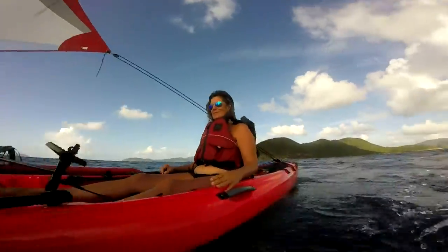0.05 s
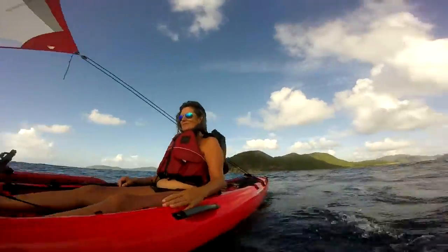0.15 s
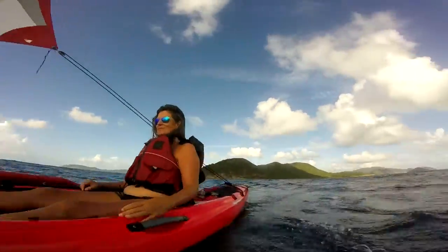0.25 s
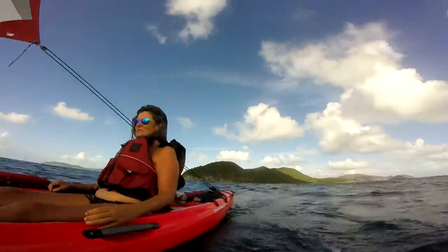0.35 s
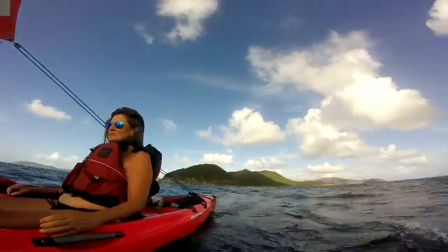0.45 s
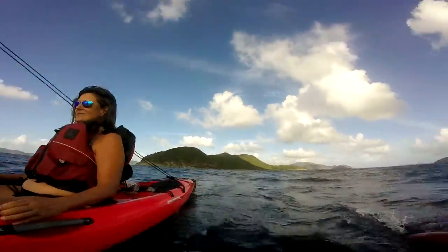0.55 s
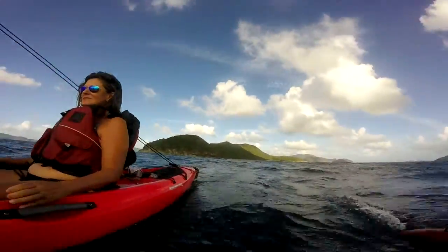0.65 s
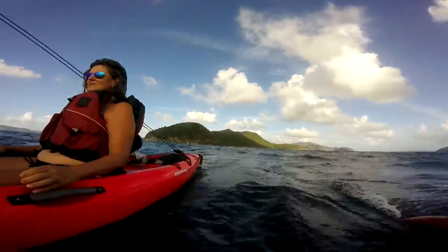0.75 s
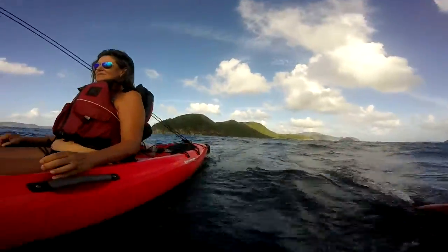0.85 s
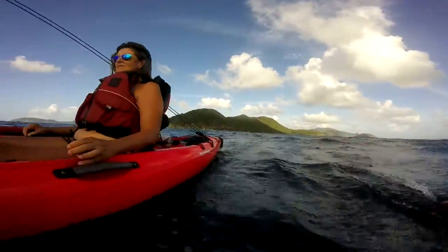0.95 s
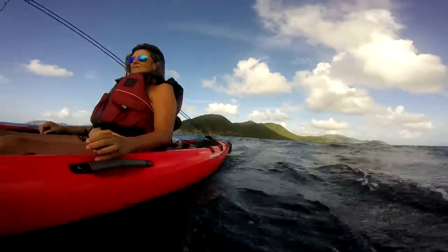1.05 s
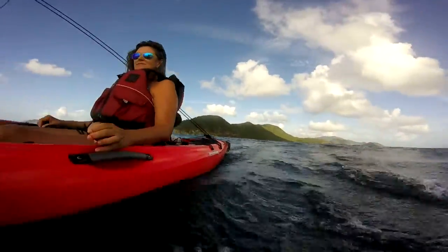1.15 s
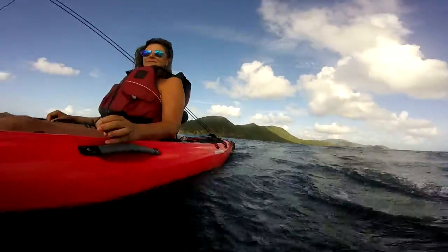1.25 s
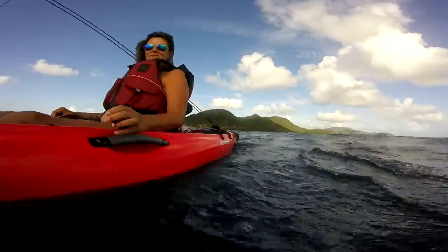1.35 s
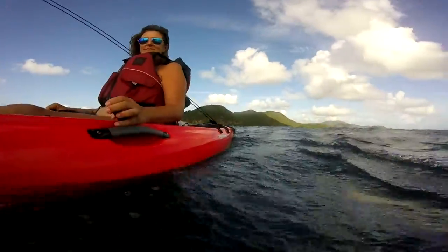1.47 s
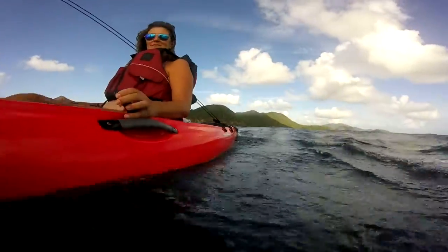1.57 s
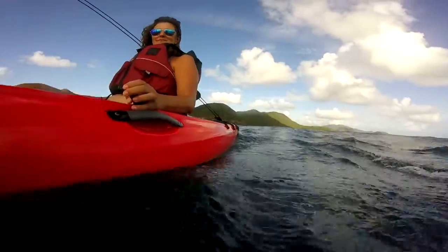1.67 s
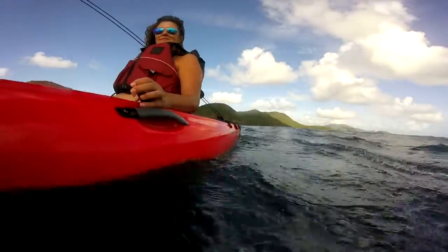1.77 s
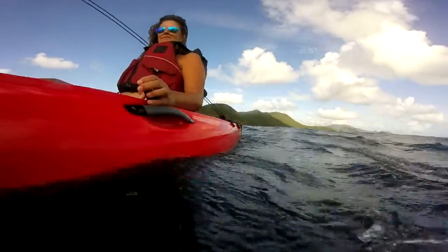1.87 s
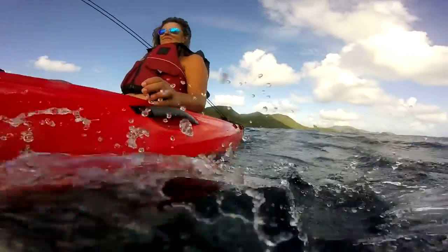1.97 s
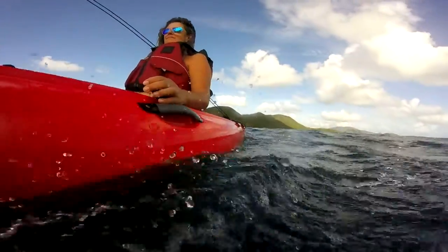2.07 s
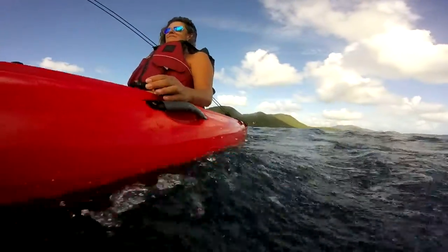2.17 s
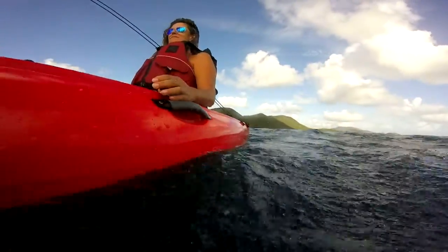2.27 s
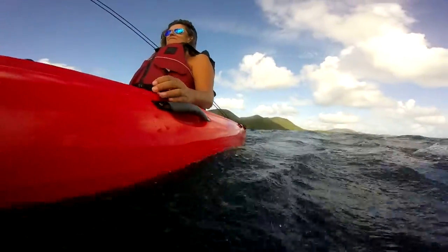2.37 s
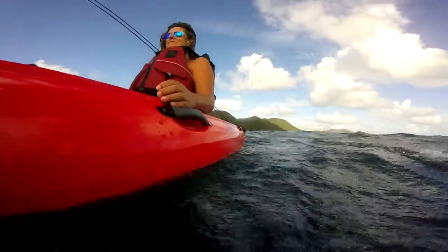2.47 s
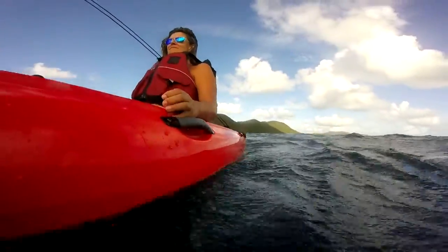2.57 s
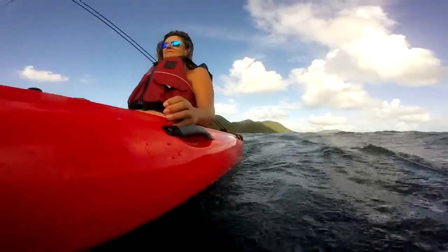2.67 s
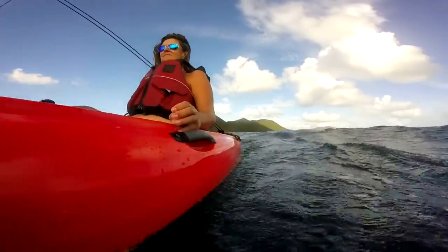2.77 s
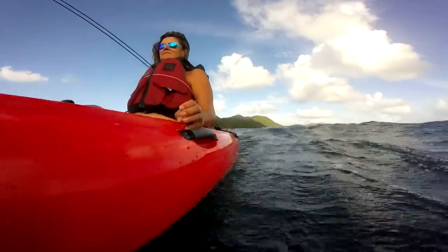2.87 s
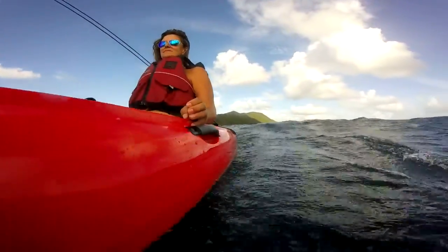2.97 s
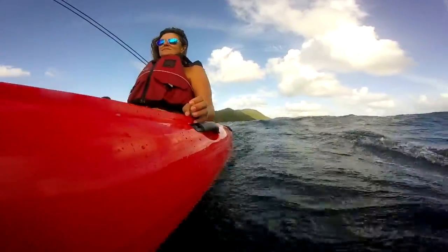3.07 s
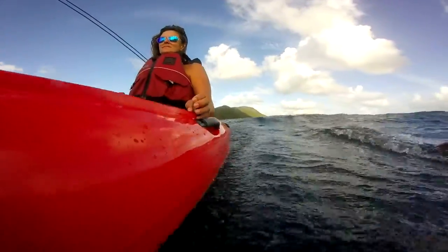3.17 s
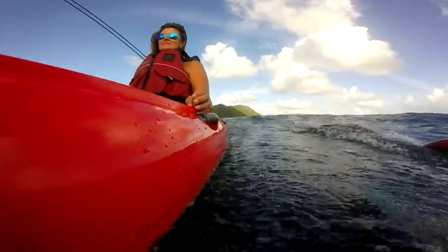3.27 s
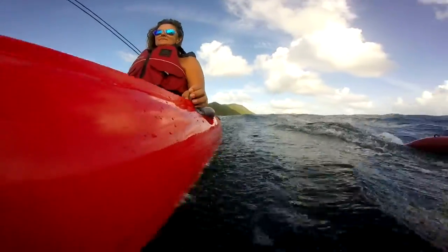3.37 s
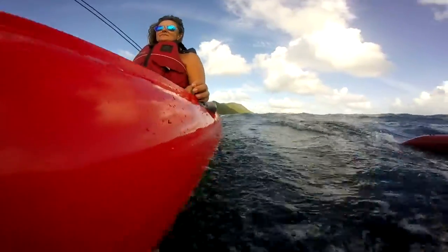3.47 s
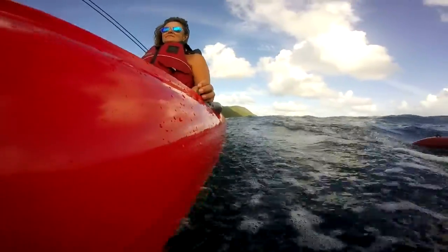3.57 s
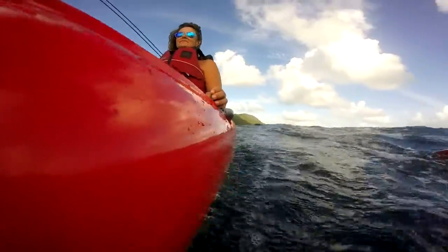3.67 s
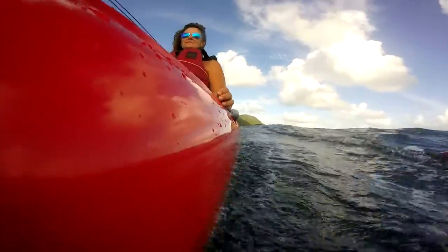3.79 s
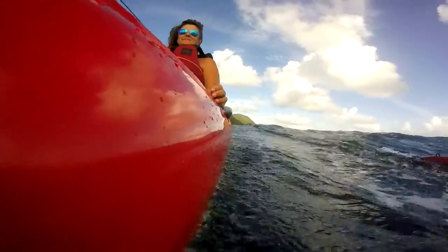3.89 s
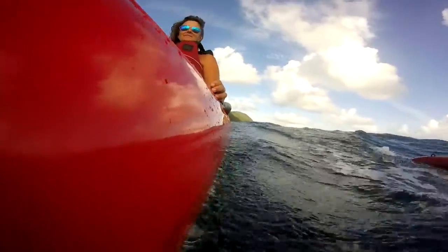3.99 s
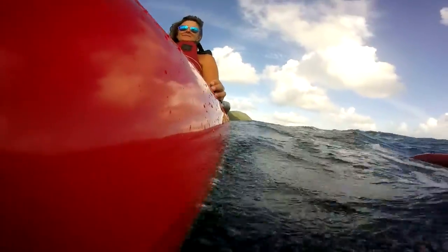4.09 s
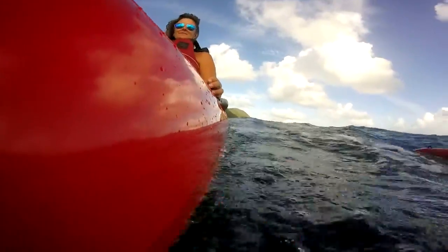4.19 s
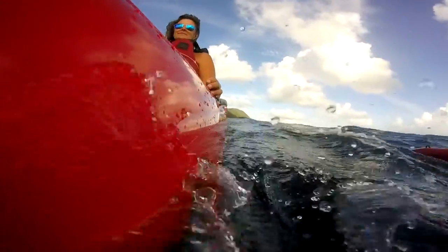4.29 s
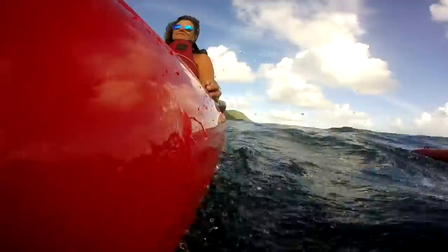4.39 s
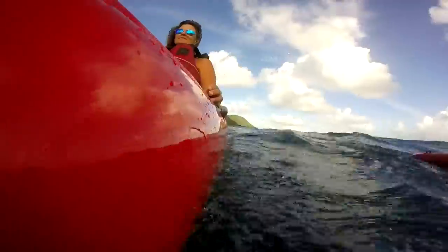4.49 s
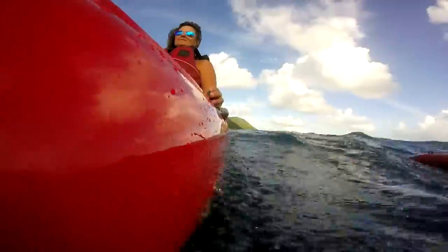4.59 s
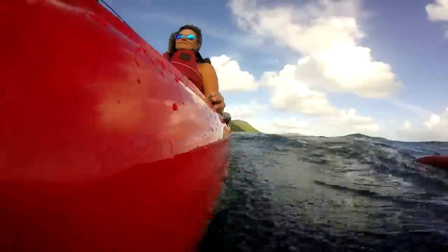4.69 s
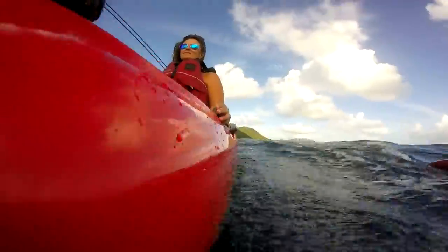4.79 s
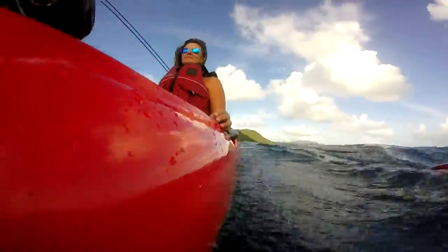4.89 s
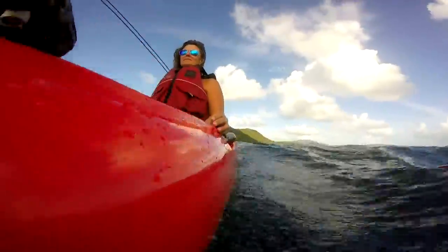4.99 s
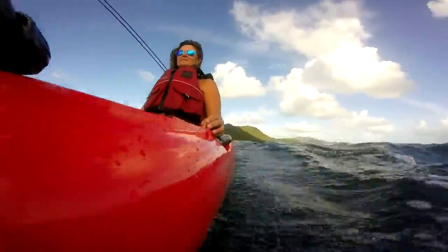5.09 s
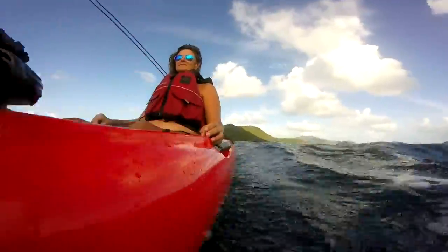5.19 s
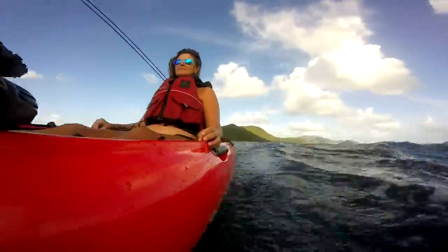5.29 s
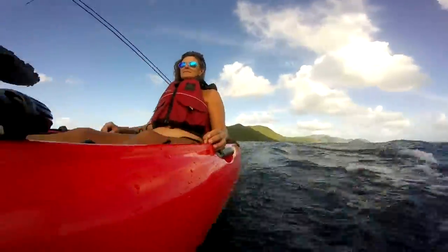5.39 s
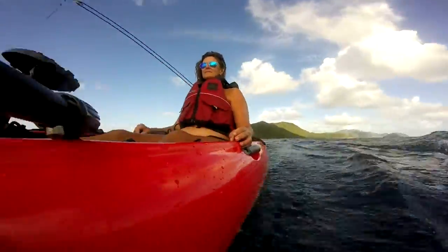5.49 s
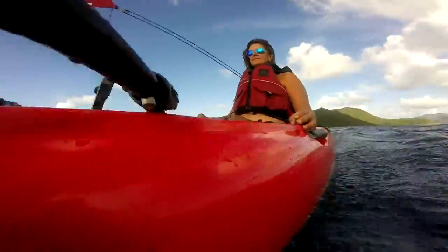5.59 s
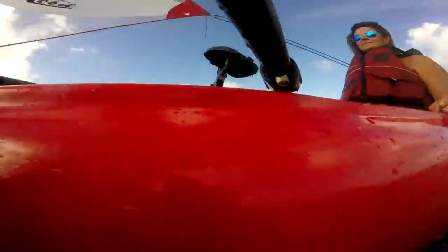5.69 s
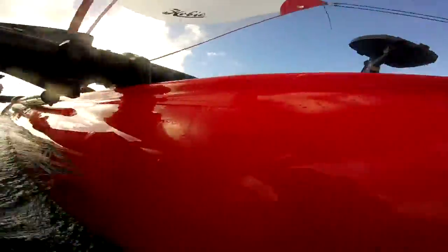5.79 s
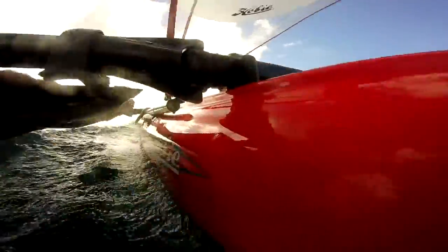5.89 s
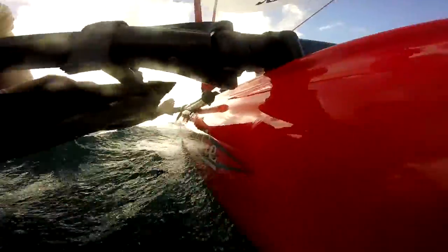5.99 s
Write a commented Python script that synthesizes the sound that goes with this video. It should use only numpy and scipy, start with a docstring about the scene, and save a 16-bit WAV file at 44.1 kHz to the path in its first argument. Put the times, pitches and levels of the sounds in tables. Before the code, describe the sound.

Choppy water washes along the hull of a small sailing boat for about six seconds, a close, slightly hollow gurgle dotted with small plops and drips. The microphone sits in a closed housing near the waterline. Low wind rumbles on it throughout, with faint foam hiss and distant sea behind. Right at the start, a drop smacks the housing with a few hard taps and low thumps. Soft wind buffets follow, and a dull bump at about 1.6 seconds. At 2 seconds a loud, brief splash slaps over the microphone in a hail of drops, trailing fine drips. The gurgling grows a little livelier between 2.5 and 3 seconds. At about 4.3 seconds a second loud splash hits with a low slosh and crackling spray, its last drops falling by 4.7 seconds. After 5 seconds the wash turns quieter, swelling slightly near the end.

```python
"""Choppy water washes along a small sailing boat and twice bursts over it in a hail of spray.
The microphone sits in a closed housing on a pole, low beside the hull. Drops smack the housing,
and bubbles make it ring at its own pitches (its modes), which gives the wash its gurgle.
Behind this, foam hisses, far water rushes, and wind and jolts push the microphone's membrane in the bass."""
import sys
import numpy as np
from scipy import signal
from scipy.io import wavfile

SR = 44100
rng = np.random.default_rng(int(sys.argv[2]) if len(sys.argv) > 2 else 0)


def wav_record(signal):
    """Record a signal, one row per channel, as 16-bit PCM in the file named by sys.argv[1]."""
    frames = np.transpose(np.atleast_2d(signal))
    bounded = np.clip(frames, -1, 1)
    # unit amplitude maps onto the largest positive 16-bit level
    quanta = np.round(bounded * 32767).astype(np.int16)
    wavfile.write(sys.argv[1], SR, quanta)


N = 266805


def from_db(db):
    """Turn decibels into a gain."""
    return 10 ** (np.asarray(db) / 20)


def rms_one(x):
    """Scale a signal to an average strength (rms) of 1."""
    return x / np.sqrt(np.mean(x ** 2) + 1e-20)


def in_time(rows, outside=None):
    """Join a table's timed rows into one curve per column."""
    s, *columns = np.transpose(rows)
    return [np.interp(np.arange(N) / SR, s, c, outside, outside) for c in columns]


def drift(rate_hz):
    """A smooth random wander, about 1 in size."""
    r = np.exp(-40 * np.pi * rate_hz / SR)
    slow = signal.lfilter([1], [1, -2 * r, r * r], rng.standard_normal(N // 20 + 2002))[2000:]
    return np.interp(np.arange(N) / 20, np.arange(len(slow)), rms_one(slow))


def grains(per_s, spread_db, noise):
    """Random clicks of uneven size, mixed with smooth noise."""
    sizes = from_db(spread_db * np.minimum(rng.exponential(1, N), 4)) * rng.choice([-1, 1], N)
    clicks = rms_one(sizes * (rng.random(N) < per_s / SR))
    return rms_one(clicks + noise * rng.standard_normal(N))


def coloured(spectrum, source, flicker_db, flicker_hz):
    """Shape noise to a tone colour, in narrow bands that each flicker on their own."""
    hz, db = np.transpose(spectrum)
    edges = hz[0] * 2 ** np.arange(0, np.log2(hz[-1] / hz[0]), 1 / 3)
    draws, out = [source(), source()], 0
    for k, low in enumerate(edges):
        band = signal.butter(2, [low, low * 2 ** (1 / 3)], "band", fs=SR, output="sos")
        level_db = np.interp(np.log(low * 2 ** (1 / 6)), np.log(hz), db)
        out += from_db(level_db + flicker_db * drift(flicker_hz)) * signal.sosfilt(band, draws[k % 2])
    return rms_one(out)


def resonance(x, hz, width_hz):
    """Let through the sound near one pitch."""
    r = np.exp(-np.pi * width_hz / SR)
    feedback = [1, -2 * r * np.cos(2 * np.pi * hz / SR), r * r]
    return signal.lfilter(np.array([1, 0, -1]) * (1 - r * r) / 2, feedback, x)


def rings(rows, crack_db=-5, crack_ms=0.41):
    """Wet rings that swell fast, die slower and rise a little in pitch; short, high ones crack."""
    out, t = np.zeros(N + 2000), np.arange(2000) / SR
    phases, noises = rng.uniform(0, 2 * np.pi, len(rows)), rng.standard_normal((len(rows), 2000))
    bright = signal.lfilter(*signal.butter(2, [3000, 9500], "band", fs=SR), noises)
    cracks = bright * np.exp(-t * 1000 / crack_ms)
    wobbles = 0.048 * np.cumsum(rng.standard_normal(noises.shape), axis=1)  # the pitch wanders
    for (s, db, hz, ms), phase, crack, wobble in zip(rows, phases, cracks, wobbles):
        rise_s = max(ms, .2) * .0004
        swell = t / rise_s * np.exp(1 - t / rise_s)
        tone = np.sin(2 * np.pi * hz * t * (1 + 6 * t) + phase + wobble)
        hardness = from_db(crack_db) * (hz / 7000) ** 4.4 / max(ms, .4)  # small drops hit harder
        at = max(round((s - rise_s) * SR), 0)
        out[at:at + 2000] += from_db(db) * (swell * tone + hardness * crack)
    return out[:N]


def pushes(rows):
    """Smooth humps of pressure that move the membrane in (+1) or out (-1)."""
    t = np.arange(N) / SR
    return sum(way * from_db(db) * np.exp(-.5 * ((t - s) * 1000 / ms) ** 2) for s, db, ms, way in rows)


# Tone colour of the far water: pitch_hz, level_db
SEA_COLOUR = [(71, -29), (120, -2), (286, -4.5), (694, -9.5), (881, -8.5), (1130, -11), (1300, -7),
              (1690, -38), (2860, -120)]
def sea(level_db=-53.5):
    """Open water rushes evenly in the distance."""
    rush = coloured(SEA_COLOUR, lambda: grains(1500, 3.3, 2.6), flicker_db=1.17, flicker_hz=5)
    return from_db(level_db) * rush


# Tone colour of the wind: pitch_hz, level_db
WIND_COLOUR = [(7.1, -40), (12, 8), (29, 1.5), (96, -9), (139, -16.5), (200, -19.5), (260, -23),
               (440, -120)]
def wind(level_db):
    """Lumpy air pressure rumbles at the microphone's opening."""
    rumble = coloured(WIND_COLOUR, lambda: rng.standard_normal(N), flicker_db=1.5, flicker_hz=2.9)
    return from_db(level_db) * rumble


# Puffs of wind: time_s, peak_db, width_ms, direction
GUSTS = [(.074, -20, 5.8, 1), (.133, -12.5, 6.4, 1), (.348, -22, 6.3, 1), (0.639, -26, 5.6, 1),
         (1.197, -23.5, 5.6, -1), (1.253, -26, 4.7, 1), (1.317, -24, 16, -1), (1.415, -24.5, 9.2, 1),
         (1.464, -25, 4.4, -1), (3.467, -32, 4.9, -1), (4.325, -23, 2.2, -1), (4.835, -33, 3.2, 1)]
def gusts():
    """Each gust moves the membrane once."""
    return pushes(GUSTS)


# Jolts of the pole: time_s, peak_db, width_ms, direction
JOLTS = [(.007, -16.5, 3.64, -1), (0.1113, -10.5, 0.75, 1), (1.6168, -11, 2.15, -1), (3.92, -21, 2.1, 1),
         (4.288, -24, 1.8, -1), (5.806, -29.5, 3.8, 1), (5.833, -30, 2.8, 1)]
def jolts():
    """A jolt swings the membrane one way, then back more softly and slowly."""
    rebounds = [(s + 3.75 * ms / 1000, db - 3.5, 2.56 * ms, -way) for s, db, ms, way in JOLTS]
    return pushes(JOLTS + rebounds)


# Hard taps: start_s, peak_db, brightness_hz, decay_ms
TAPS = [(0.0871, -17, 9150, 0.73), (0.0984, -16.5, 2440, 1), (0.1098, -19.5, 2160, 1),
        (.1178, -45, 12000, .4), (1.5633, -37, 12000, .4)]
def taps():
    """Taps reach the housing through its pole as bursts of noise that die at once."""
    out, t = np.zeros(N), np.arange(600) / SR
    for (s, db, hz, ms), noise in zip(TAPS, rng.standard_normal((len(TAPS), 600))):
        burst = signal.lfilter(*signal.butter(3, hz, fs=SR), noise * np.exp(-t * 1000 / ms))
        at = round(s * SR)
        out[at:at + 600] += from_db(db) * burst / np.abs(burst).max()
    return out


# Tone colour of the foam: pitch_hz, level_db
HISS_COLOUR = [(2060, -24), (3500, -3.5), (5150, -11), (8960, -14), (10900, -26.5), (14600, -21),
               (15500, -42)]
# High modes of the housing: pitch_hz, width_hz, gain_db
HISS_MODES = [(6000, 690, -0.5), (8670, 700, 0)]
def hiss(level_db):
    """Fine spray and foam, muffled by the housing and lifted at its high modes."""
    fizz = coloured(HISS_COLOUR, lambda: grains(2500, 2.9, 0.8), flicker_db=1.8, flicker_hz=4.2)
    fizz = fizz + sum(from_db(db) * resonance(fizz, hz, width_hz) for hz, width_hz, db in HISS_MODES)
    return from_db(level_db + 1.8 * drift(48)) * rms_one(fizz)


# Modes of the housing that the wash sets ringing: pitch_hz, width_hz, gain_db
HOUSING_MODES = [(1398, 179, 1.5), (1846, 305, -3), (2122, 370, -4), (2920, 660, -6), (3370, 1030, -14)]
def wash(lowest_db, upper_db):
    """Bubbles burst along the hull in clumps; each mode catches its own share."""
    clumps, modes = from_db(1.85 * drift(46)), []
    for hz, width_hz, db in HOUSING_MODES:
        bursts = grains(900, 3.36, 0.93) * from_db(2.85 * drift(9.1))
        once = resonance(bursts, hz, width_hz * 1.5)
        twice = resonance(once, hz, width_hz * 1.3)  # for a clearer pitch
        modes.append(from_db(db) * rms_one(twice))
    return clumps * (from_db(lowest_db) * modes[0] + from_db(upper_db) * sum(modes[1:]))


def plop_ms(hz):
    """Higher rings are shorter."""
    return 0.65 + 3.81 * (HOUSING_MODES[0][0] / hz) ** 2.16


def bubbles(lowest_db, upper_db, count=60, above_wash_db=12):
    """Rows for rings(): stray bubbles sound near the four lowest modes."""
    rows = []
    for when, mode, detune, size in rng.random((count, 4)):
        k, at = int(mode * 4), int(when * N)
        mode_hz, width_hz, mode_db = HOUSING_MODES[k]
        hz = mode_hz + width_hz * (detune - .5)
        wash_db = (upper_db if k else lowest_db)[at] + mode_db
        rows.append((at / SR, wash_db + above_wash_db + 3.2 * (size - .5), hz, plop_ms(hz)))
    return rows


# Hollow knocks: time_s, peak_db, pitch_hz, length_ms
GULPS = [(1.988, -25, 289, 14), (4.325, -28.5, 149, 20), (4.69, -37.5, 150, 20)]
# Bubbles and drips, plus a few high ticks of big drops at their own pitch: time_s, peak_db, pitch_hz
PLOPS = [(0.067, -33, 1450), (0.071, -37, 6050), (0.249, -36, 1370), (0.362, -32.5, 1690),
         (0.436, -37.5, 1320), (0.603, -35, 1430), (0.8094, -28.5, 1320), (0.8505, -33, 1810),
         (1.234, -25, 2570), (1.285, -32.5, 2980), (1.417, -35.5, 1420), (1.6495, -29.5, 2030),
         (1.8037, -30, 1430), (1.9817, -31, 12180), (2.0622, -31, 9050), (2.1161, -40.5, 6230),
         (2.124, -30.5, 1400), (2.152, -27, 1400), (2.175, -30.5, 1380), (2.1821, -37, 8360),
         (2.2013, -26, 5800), (2.2112, -27.5, 5000), (2.276, -39, 1450), (2.3155, -37, 7180),
         (2.4938, -34, 1450), (2.663, -29.5, 2100), (2.6672, -28, 1390), (2.7245, -31, 1880),
         (2.751, -25.5, 1460), (2.78, -29.5, 1390), (2.9211, -20, 2620), (3.0159, -29, 1420),
         (3.0269, -40, 5770), (3.3004, -31.5, 2710), (3.4682, -36, 1410), (3.4725, -34, 1960),
         (3.56, -36, 1400), (3.8578, -32, 1990), (3.9161, -31.5, 2080), (4.0116, -32, 2130),
         (4.037, -31.5, 2210), (4.1463, -30.5, 1290), (4.1945, -45, 5270), (4.2849, -32, 8750),
         (4.357, -15, 6600), (4.3837, -25, 6840), (4.4054, -29, 6360), (4.4125, -27.5, 6700),
         (4.7862, -33.5, 1780), (4.9244, -36.5, 2500), (5.107, -37.5, 1970), (5.4843, -38.5, 1380),
         (5.696, -40, 1430), (5.6985, -34, 1940), (5.8914, -34.5, 1470)]
def gulps_and_plops():
    """Rows for rings(): water knocks on the hull, single plops stand out of the wash, and a few big drops tick
    high at their own pitch."""
    return GULPS + [(s, db, hz, plop_ms(hz)) for s, db, hz in PLOPS]


# Tone colours of the three parts of a sheet of spray: pitch_hz, level_db
PATTER_COLOUR = [(290, -45.5), (500, -8), (684, -16), (983, -0.5), (1440, -12), (2200, 2.5), (2590, -6),
                 (3000, -6.5), (3310, -3), (5200, -25.5), (6760, -50), (11400, -120)]
SPRAY_COLOUR = [(2820, -24), (4800, 1), (5450, -17), (5700, -5), (6670, 3.5), (7950, 3), (8600, -3),
                (10300, -16.5), (15500, -19)]
SLOSH_COLOUR = [(15, -39.5), (25, -8), (85, -2), (174, -3), (236, -7), (487, -12.5), (700, -22), (910, -28),
                (1540, -120)]
# Sheets of spray, one list each: time_s, patter_db, spray_db, slosh_db
SHEETS = [
    [(1.962, -60, -70, -57), (1.969, -43, -51, -25.5), (1.979, -27, -50, -27.5), (1.984, -12.5, -42, -24),
     (1.997, -22, -46, -26.5), (2.014, -20, -43, -29), (2.018, -16, -24.5, -26), (2.042, -30, -28.5, -38),
     (2.062, -28.5, -53, -42), (2.072, -43.5, -60, -52), (2.11, -73, -77, -72)],
    [(4.275, -66, -70, -55), (4.292, -50, -53, -31), (4.299, -26.5, -48, -33.5), (4.334, -19, -36, -29.5),
     (4.346, -22.5, -41, -32.5), (4.352, -17.5, -22.5, -33), (4.378, -30, -32, -35),
     (4.387, -29.5, -51, -43), (4.412, -32.5, -57, -40), (4.42, -59, -64, -40), (4.435, -61, -75, -60)],
]
def sheets():
    """Small drops hail on the housing while water sloshes over its opening."""
    patter = coloured(PATTER_COLOUR, lambda: grains(700, 4.2, 0.21), flicker_db=5, flicker_hz=97)
    spray = coloured(SPRAY_COLOUR, lambda: grains(1200, 5, .35), flicker_db=3, flicker_hz=150)
    slosh = coloured(SLOSH_COLOUR, lambda: rng.standard_normal(N), flicker_db=5, flicker_hz=24.5)
    out = 0
    for sheet in SHEETS:
        patter_db, spray_db, slosh_db = in_time(sheet, outside=-200)
        out += from_db(patter_db) * patter + from_db(spray_db) * spray + from_db(slosh_db) * slosh
    return out


def droplets(count=60, level_db=-50, low_hz=5300, high_hz=8700, wait_s=0.11, thin_out_s=.2):
    """Rows for rings(): half of these fine drops trail the sheets, the rest fall at any time."""
    rows = []
    for k, (when, pitch, size) in enumerate(rng.random((count, 3))):
        sheet_end_s = SHEETS[k // 2 % 2][-1][0]
        s = sheet_end_s + wait_s - thin_out_s * np.log(1 - when) if k % 2 else when * N / SR
        hz = low_hz * (high_hz / low_hz) ** pitch
        rows.append((min(s, N / SR), level_db + 8 * (size - .5), hz, plop_ms(hz)))
    return rows


# Big drops: time_s, peak_db, pitch_hz, length_ms, thud_db, tick_db (the last two add to peak_db)
SMACKS = [(0.0865, -4, 2340, 0.6, -21, -27), (0.1, -22.5, 2000, 2.2, -13, -60),
          (1.5631, -35, 2370, 2.2, -5, -1.5), (1.9815, -15, 2230, 0.65, -30, -20),
          (1.9851, -1.5, 2310, 1.85, -10, -40), (1.9885, -2.5, 2560, 0.88, -6, -21),
          (1.993, -10, 2210, 1.25, -5, -22), (2.0062, -12, 2220, 2.9, -1.5, -15),
          (2.015, -11.5, 1530, 1.03, -30, -5), (2.018, -8, 2220, 2.44, -7, -6),
          (2.0307, -19, 2310, .9, -30, -15), (2.034, -16, 2820, 0.6, -30, -9),
          (2.039, -15.5, 1970, 0.65, -30, 7), (2.043, -19, 2170, .9, -30, -6),
          (2.0555, -16, 2550, 0.85, -30, -18), (2.1774, -29.5, 3030, 1.2, -20, -13),
          (2.2013, -28.5, 2260, 1.5, -30, -12), (2.212, -28.5, 3250, 1.5, -12.5, -12),
          (4.3041, -11.5, 2400, 2, -30, -11), (4.3086, -18, 3620, 1.9, 0, -8),
          (4.32, -1.5, 2080, 1.1, -8, -28), (4.332, -7, 2980, 1.07, -3, -16),
          (4.3365, -6.5, 2070, 2.13, -5, -17), (4.3432, -17, 2420, 1.2, -3, -6),
          (4.3502, -2, 2770, 0.83, -15, -15), (4.3607, -12.5, 2770, 1.4, -7, -10),
          (4.366, -11.5, 2250, 0.64, -6, -12), (4.371, -21, 3020, 1.4, -20, 1),
          (4.3784, -16.5, 2200, .7, -30, -8), (4.3975, -21.5, 2930, 1.1, -30, -12),
          (4.452, -27, 2150, .7, -28, -20), (4.4569, -18.5, 2200, 0.62, -13.5, -20),
          (4.481, -27.5, 2190, 0.93, -12, -30), (4.5797, -37, 3230, 1.6, -32, -7),
          (4.672, -29.5, 3230, 0.75, -30, -16), (4.681, -29, 2360, 1.5, -30, -15)]
def smacks(thud_hz=1054, thud_ms=1.38, tick_hz=7000, tick_ms=.7):
    """Rows for rings(): each big drop hits the housing with a ring, a low thud and a high tick."""
    rows, detunes = [], 1 + 0.082 * rng.standard_normal((len(SMACKS), 2))
    for (s, db, hz, ms, thud_db, tick_db), (thud_detune, tick_detune) in zip(SMACKS, detunes):
        rows.append((s, db, hz, ms))
        rows.append((s, db + thud_db, thud_hz * thud_detune, thud_ms))
        rows.append((s, db + tick_db, tick_hz * tick_detune, tick_ms))
    return rows


# How loud the steady sounds are: time_s, lowest_mode_db, upper_modes_db, hiss_db, wind_db
STEADY_LEVELS = [(0.0, -55.5, -53.5, -67, -32.5), (0.17, -52, -47.5, -59, -38.5),
                 (0.3, -53, -52.5, -62, -40), (0.6, -55, -52.5, -65, -42), (0.86, -47, -49.5, -62.5, -42),
                 (1.05, -51.5, -51, -64, -41.5), (1.3, -51, -47.5, -60.5, -41),
                 (1.6, -58.5, -53, -65, -39.5), (1.8, -50, -49, -59.5, -46.5),
                 (2.17, -48, -51.5, -65, -49.5), (2.45, -46, -47, -60, -49.5),
                 (2.62, -46, -49.5, -62, -46.5), (2.68, -44.5, -43.5, -63.5, -49.5),
                 (2.9, -42.5, -48, -62, -47), (3.1, -46.5, -49.5, -61.5, -45.5),
                 (3.22, -56.5, -50, -62, -47.5), (3.69, -49.5, -51, -64.5, -42),
                 (4.03, -49.5, -50, -66, -41.5), (4.26, -46, -47.5, -65.5, -44),
                 (4.5, -53, -51, -64, -48.5), (4.66, -52.5, -47.5, -58, -45),
                 (4.85, -53, -52.5, -67.5, -43.5), (5.14, -63, -56, -65.5, -47),
                 (5.51, -65, -56.5, -68, -48), (5.81, -56.5, -52, -64.5, -40),
                 (6.05, -58.5, -56, -65.5, -42.5)]
def scene():
    """Add up all the sounds at the one microphone."""
    lowest_db, upper_db, hiss_db, wind_db = in_time(STEADY_LEVELS)
    water = wash(lowest_db, upper_db) + hiss(hiss_db) + sheets()
    water += rings(gulps_and_plops() + smacks() + bubbles(lowest_db, upper_db) + droplets())
    return (water + wind(wind_db) + sea() + gusts() + jolts() + taps())[None]


def record(dry, leak_hz=7.9, cutoff_hz=15700):
    """The membrane leaks slow pressure, loud peaks are rounded off and the highest treble is cut."""
    sound = signal.sosfilt(signal.butter(1, leak_hz, "high", fs=SR, output="sos"), dry)
    rounded = sound / (1 + np.abs(sound) ** 4) ** .25
    return signal.sosfilt(signal.cheby2(12, 60, cutoff_hz, fs=SR, output="sos"), rounded)


dry = scene()
out = record(dry)
wav_record(out)
```